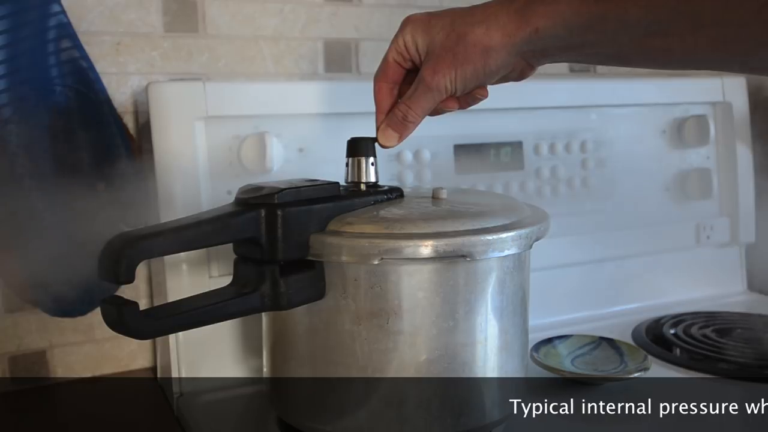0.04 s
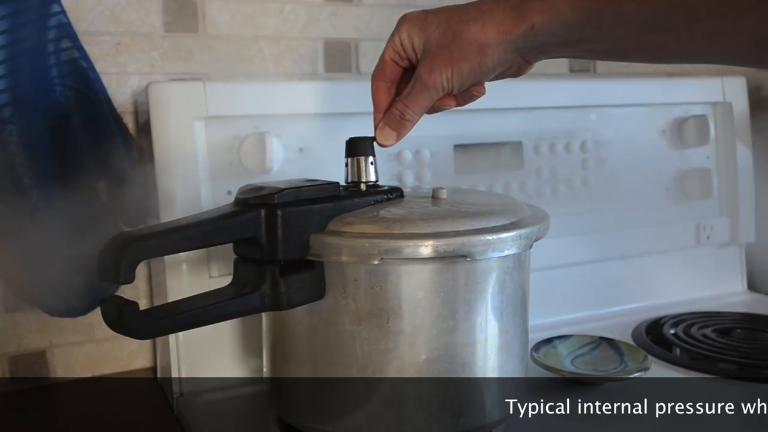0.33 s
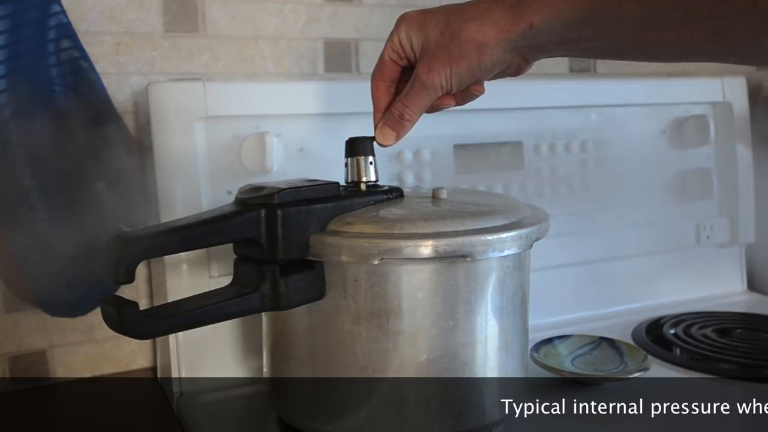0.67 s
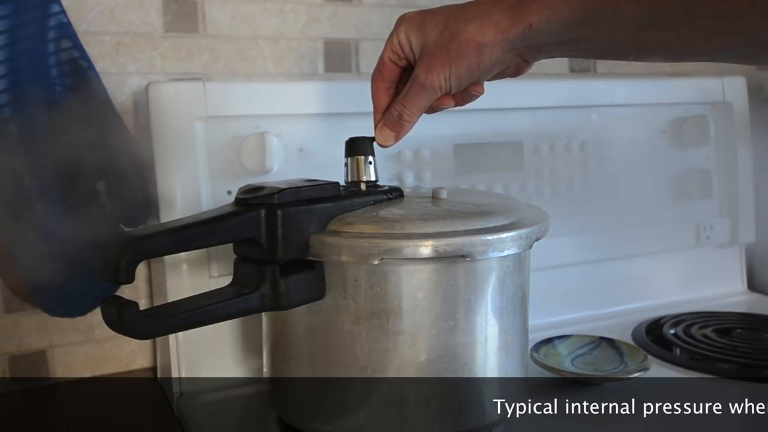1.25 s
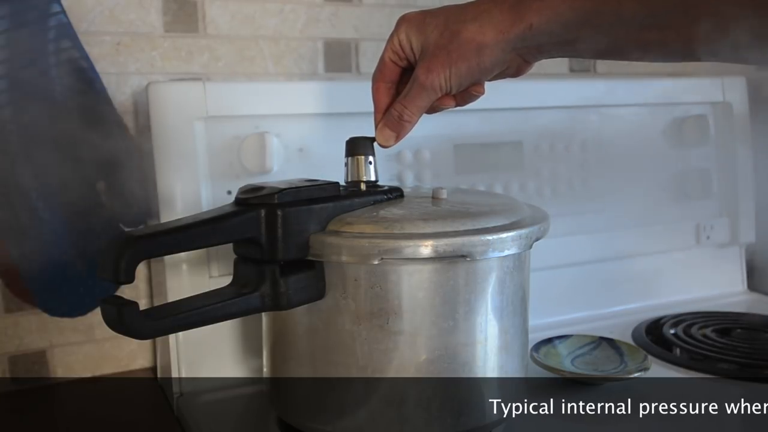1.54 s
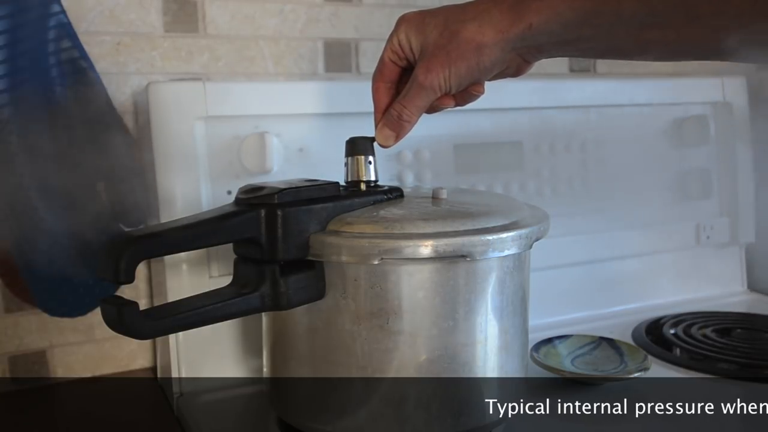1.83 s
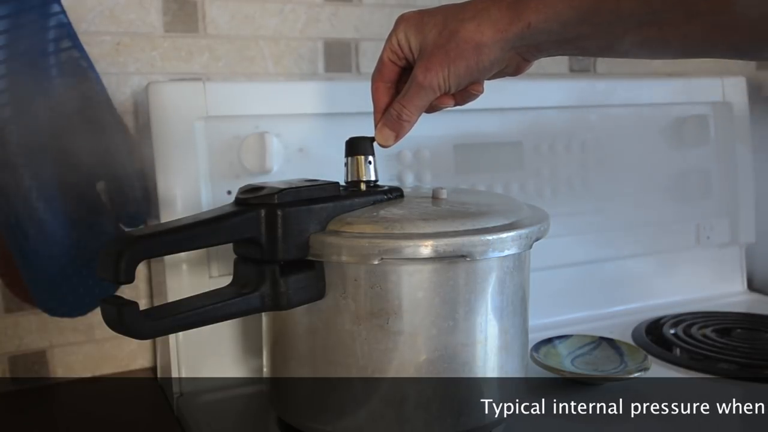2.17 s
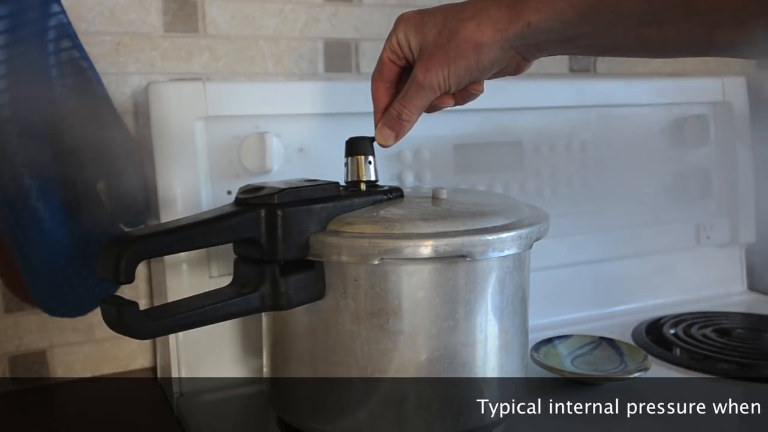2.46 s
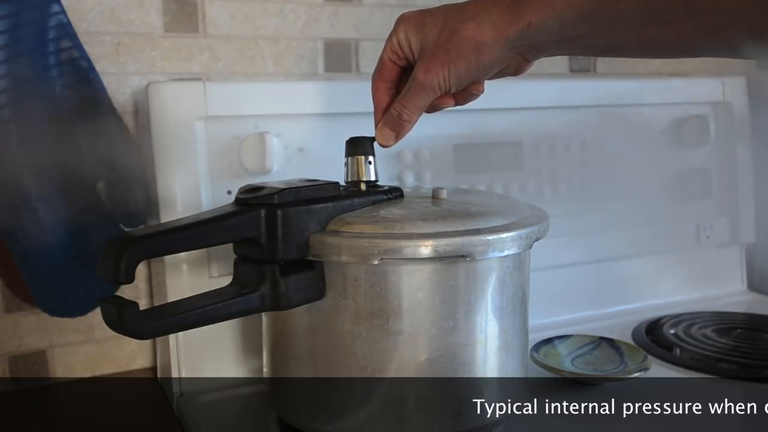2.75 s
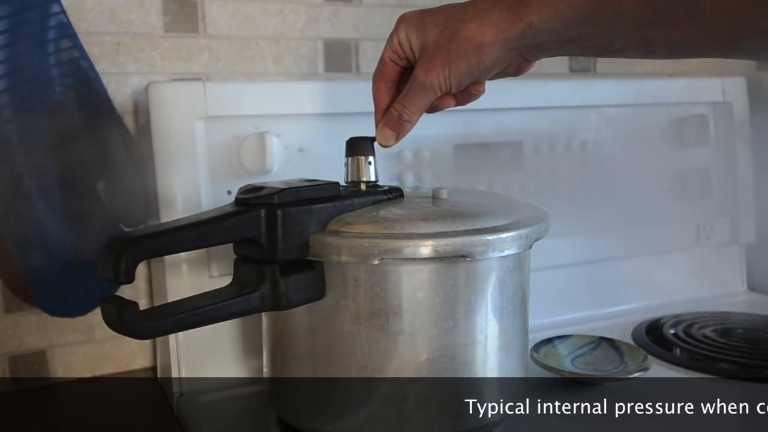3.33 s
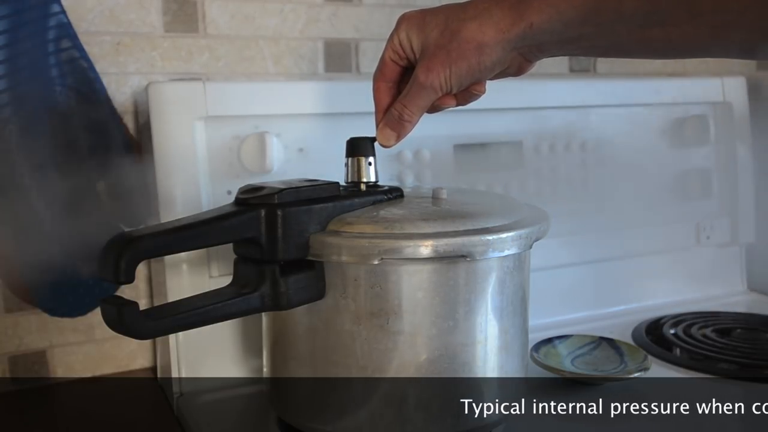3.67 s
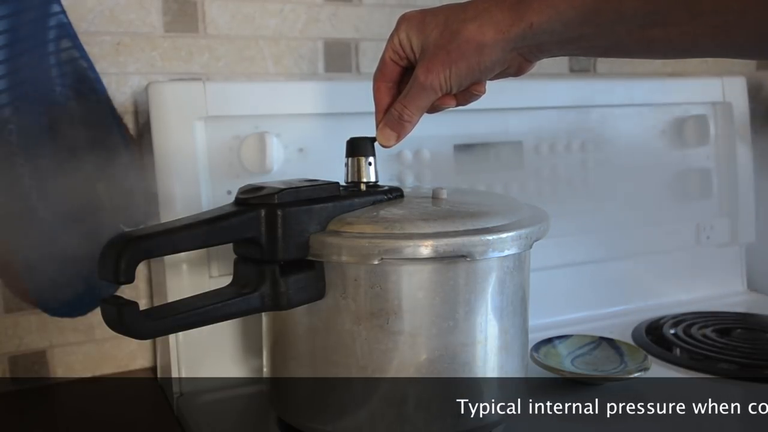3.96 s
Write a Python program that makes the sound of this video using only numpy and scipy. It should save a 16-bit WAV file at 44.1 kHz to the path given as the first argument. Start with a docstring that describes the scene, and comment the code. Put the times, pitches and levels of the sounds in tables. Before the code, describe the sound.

A loud, bright hiss of steam escapes from a pressure cooker valve, at full strength from the first instant. Faint, narrow whistles ring within the even rush. It swells barely noticeably near 1.7, 2.5 and 3.2 seconds and is still going at the end, at 4 seconds. It is heard from in front of the stove, with the short reflections of a small kitchen.

```python
"""Steam escapes from a pressure cooker whose valve weight is held tipped by a hand.
From the first instant there is one loud, even hiss: a turbulent jet, coloured by the hollows of the
valve and ringing faintly in narrow whistles. A small kitchen throws it back; the pot simmers far below.
The flow swells by under a decibel near 1.65, 2.5 and 3.15 s, and is still going at the end, at 4 s."""
import sys
import numpy as np
from scipy.fft import rfft, irfft
from scipy.io import wavfile

SR = 44100
rng = np.random.default_rng(int(sys.argv[2]) if len(sys.argv) > 2 else 0)


def waveform_to_disk(signal):
    """Save audio, clipped to [-1, 1], as 16-bit WAV at the path in sys.argv[1]."""
    frames = np.transpose(np.atleast_2d(signal))
    scaled = np.clip(frames, -1, 1) * 32767
    samples = np.round(scaled).astype(np.int16)
    wavfile.write(sys.argv[1], SR, samples)


N = 176400
HZ = np.clip(np.arange(N // 2 + 1) * SR / N, 1, None)

# Low murmur of the boil: frequency_hz, level_db
SIMMER_TONE = [(15, -32), (25, -22), (38, -12), (52, -11), (85, -4), (110, -12), (150, 1), (230, -1),
               (400, -5), (900, -24)]
# Body resonances of the pot: pitch_hz, width_hz, gain_db
POT_RESONANCES = [(139, 10, 4), (177.6, 8.4, 8)]
# Bright, broad tone of the jet: frequency_hz, level_db
JET_TONE = [(20, -75), (100, -45), (280, -34), (500, -28.5), (750, -25), (1000, -20.5), (1500, -17.5),
            (1850, -11.9), (2450, -10), (3400, -6), (4000, -4.1), (5200, -3.0), (7500, -2.0), (9400, -2.0),
            (11000, -7.2), (12200, -11.5), (14000, -15), (15700, -23)]
# Broad peaks and dead notches of the valve's hollows: pitch_hz, width_hz, gain_db
VALVE_HOLLOWS = [(1735, 86, 4.5), (3897, 300, 5), (4380, 140, 4.5), (4640, 148, -0.5), (5149, 302, 3.6),
                 (5450, 190, 5.5), (5723, 306, -11.5), (6430, 191, 1.9), (6904, 177, -15), (7226, 250, 4.5),
                 (7971, 203, 4.5), (8600, 116, -3), (10180, 154, -3.5), (10706, 135, 3)]
# Faint, narrow whistles in the hiss: pitch_hz, width_hz, gain_db
JET_WHISTLES = [(708, 13, 3.5), (900, 28, 3.2), (1067, 23, 3.1), (1221, 29, 3), (1483, 24, 3.5),
                (3480, 13, 3), (3783, 15, 6.3), (3867, 18, 1.5), (4237, 18, 5), (4884, 18, 5.5),
                (4930, 12, 4.9), (5000, 18, 5), (5140, 25, 3.5), (6299, 23, 5.7), (6742, 18, 4),
                (7034, 16, 6.3), (8236, 17, 3), (8801, 42, 6), (9487, 21, 5), (12285, 37, 1),
                (13071, 84, 6)]
# Strength of the escaping steam: time_s, level_db
STEAM_FLOW = [(0, -0.3), (.7, 0), (1.4, 0), (1.65, 0.6), (2.0, 0), (2.5, 0.5), (2.85, -0.2), (3.15, 0.7),
              (3.55, 0.55), (4, 0.2)]

SIMMER_DB, SIMMER_SWELL_DB, SIMMER_SWELL_HZ = -59, 2, 7
KITCHEN_DB, KITCHEN_T60_S, FIRST_ECHO_S = -9.5, 0.34, 0.003
HISS_DB, CUTOFF_HZ = -13.5, 15740
SURGE_DB, SURGE_HZ = 0.12, 3.8
FLUTTER_DB, FLUTTER_HZ = 0.53, 52


def from_db(db):
    """Decibels to gain."""
    return 10 ** (np.asarray(db) / 20)


def unit_rms(x):
    """Scale to an rms of 1."""
    return x / np.sqrt(np.mean(x ** 2) + 1e-20)


def tone_curve(points):
    """An EQ curve joining (frequency_hz, level_db) points on a log axis."""
    hz, db = np.transpose(points)
    return from_db(np.interp(np.log(HZ), np.log(hz), db))


def resonances(rows):
    """Response of a chain of second-order peaks and notches."""
    response = 1
    for pitch_hz, width_hz, gain_db in rows:
        detune = (pitch_hz ** 2 - HZ ** 2) / (HZ * width_hz)
        lift = from_db(gain_db / 2)
        response = response * (detune + 1j * lift) / (detune + 1j / lift)
    return response


def noise(response):
    """White noise through the given frequency response."""
    return irfft(rfft(rng.standard_normal(N)) * response, N)


def drift(rate_hz):
    """Random modulation with an rms of 1, moving mostly slower than rate_hz."""
    return unit_rms(noise(1 / (1 + (HZ / rate_hz) ** 2)))


def simmer():
    """The low bed: an uneven boil, muffled by the closed pot and resonating in it."""
    murmur = unit_rms(noise(tone_curve(SIMMER_TONE) * resonances(POT_RESONANCES)))
    return murmur * from_db(SIMMER_SWELL_DB * drift(SIMMER_SWELL_HZ))


def kitchen_reverb(source):
    """Dense, dying reflections from stove and walls; the tail wraps round, so it starts built up."""
    t = np.arange(N) / SR
    echoes = rng.standard_normal(N) * from_db(-60 * t / KITCHEN_T60_S) * (t > FIRST_ECHO_S)
    echoes /= np.sqrt(np.sum(echoes ** 2))
    return irfft(rfft(source) * rfft(echoes), N)


def steam_jet():
    """Turbulent noise whose bands surge together and flutter separately, shaped by the valve."""
    flow_db = np.interp(np.arange(N) / SR, *np.transpose(STEAM_FLOW))
    surge_db = flow_db + SURGE_DB * drift(SURGE_HZ)
    band_edges_hz = [0, 1000, 2000, 4000, 8000, SR]
    eddies = np.zeros(N)
    for low, high in zip(band_edges_hz, band_edges_hz[1:]):
        band = noise((HZ >= low) & (HZ < high))
        eddies += band * from_db(surge_db + FLUTTER_DB * drift(FLUTTER_HZ))
    colour = tone_curve(JET_TONE) * resonances(VALVE_HOLLOWS) * resonances(JET_WHISTLES)
    return irfft(rfft(eddies) * colour, N)


def scene():
    """Hiss and room over the simmer, heard in front of the stove, the same in both channels."""
    jet = steam_jet()
    hiss = unit_rms(jet + from_db(KITCHEN_DB) * kitchen_reverb(jet))
    mix = from_db(HISS_DB) * hiss + from_db(SIMMER_DB) * simmer()
    return np.stack([mix, mix])


def record(dry):
    """A brick-wall low-pass takes the very top off the hiss."""
    return irfft(rfft(dry) / np.sqrt(1 + (HZ / CUTOFF_HZ) ** 1500), N)


dry = scene()
out = record(dry)
waveform_to_disk(out)
```